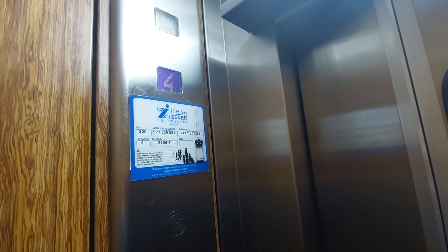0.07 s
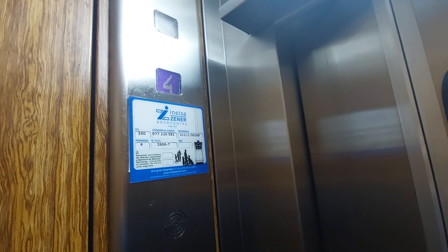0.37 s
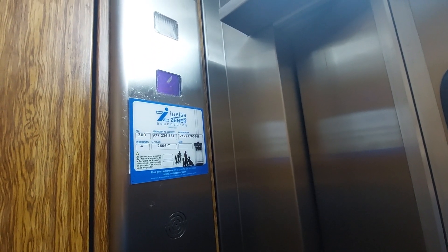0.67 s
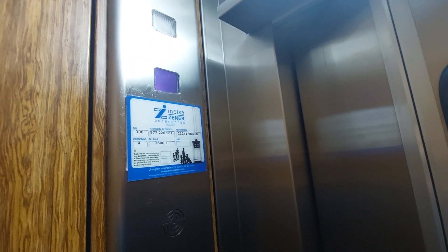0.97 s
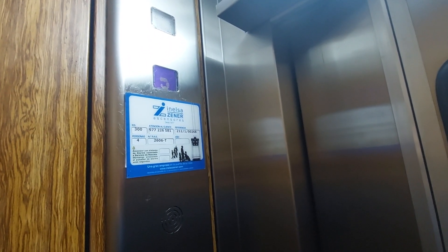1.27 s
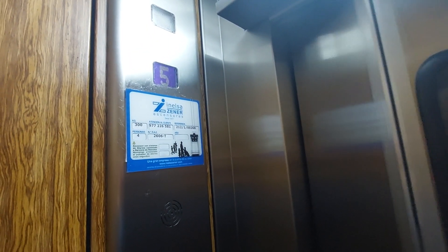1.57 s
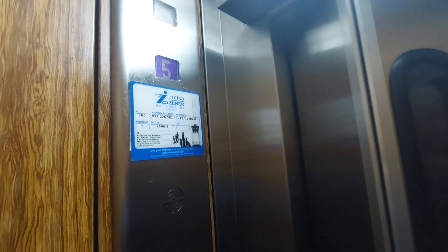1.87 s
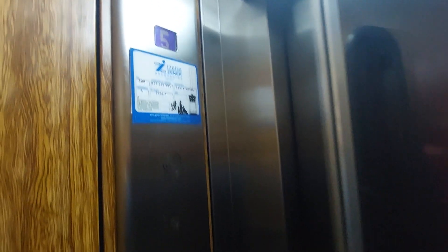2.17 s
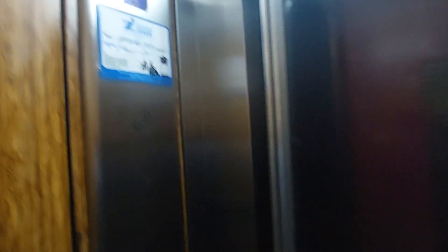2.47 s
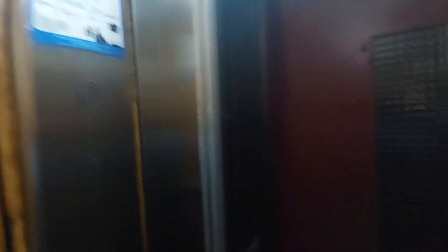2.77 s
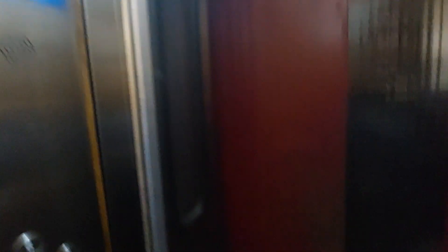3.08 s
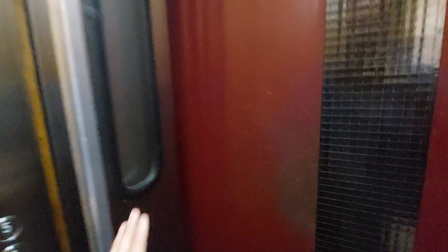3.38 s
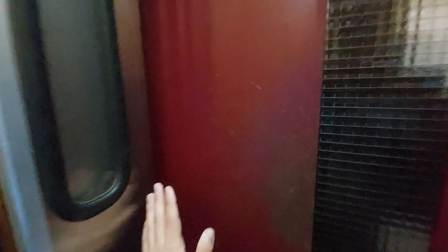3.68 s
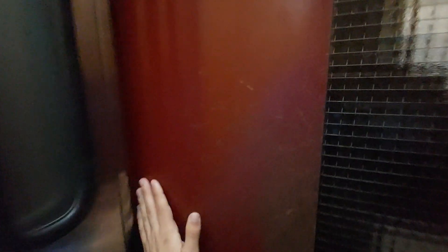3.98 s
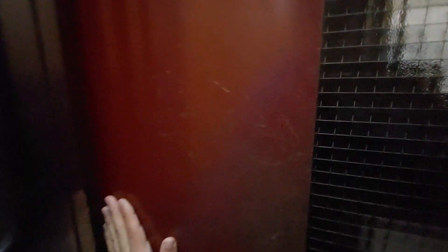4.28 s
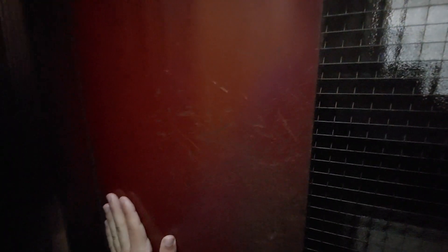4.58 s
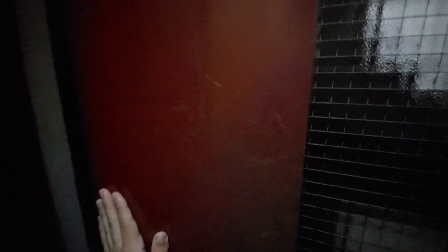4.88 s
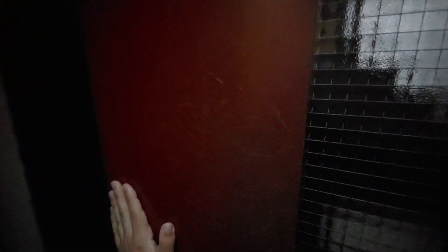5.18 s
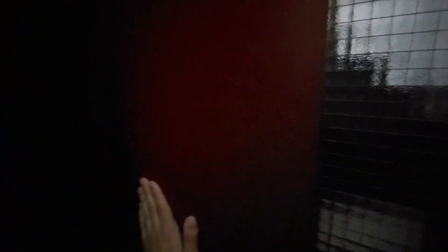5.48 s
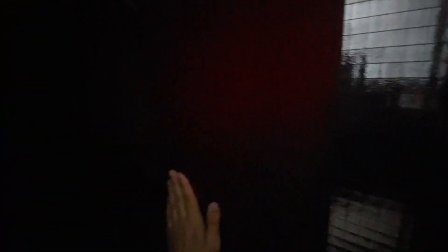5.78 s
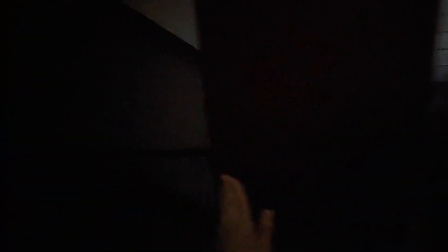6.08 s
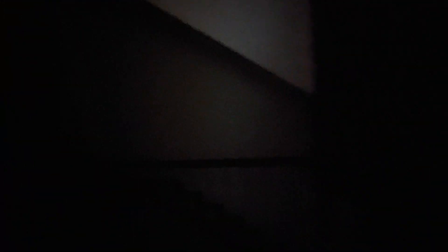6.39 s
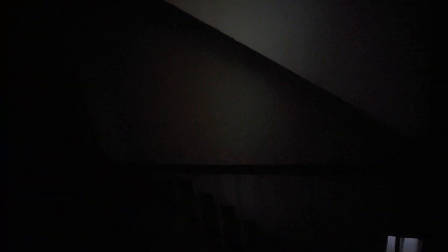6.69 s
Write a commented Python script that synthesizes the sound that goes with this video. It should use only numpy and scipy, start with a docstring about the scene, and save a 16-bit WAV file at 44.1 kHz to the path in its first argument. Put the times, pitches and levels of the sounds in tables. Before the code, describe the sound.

Inside a small lift, the sliding steel doors engage with a sharp clunk and clatter, then roll open with a low motor hum, rumble and loose metallic rattling. As they stop, a hinged metal landing door is pushed: its catch clacks and the stiff hinge gives a low, booming groan. Dull footsteps and a few knocks follow out into a quiet stairwell. Everything is heard close up.

```python
"""Leaving a small steel lift

The door motor hums while the sliding panels roll open, shudder and rattle.
Then a hand pushes the hinged landing door: its catch clacks, the hinge sticks and slips so that it
groans through the metal door, and there are dull steps and knocks out in the stairwell."""
import sys
import numpy as np
from scipy import signal
from scipy.fft import rfft, irfft
from scipy.io import wavfile
from scipy.ndimage import uniform_filter1d

SR = 44100
rng = np.random.default_rng(int(sys.argv[2]) if len(sys.argv) > 2 else 0)


def bounce(signal):
    """Save signal as a 16-bit WAV file at the path given by the first command-line argument."""
    frames = np.transpose(np.atleast_2d(signal))
    limited = np.clip(frames, -1, 1)
    pcm = np.round(limited * 32767).astype(np.int16)
    wavfile.write(sys.argv[1], SR, pcm)


N = 301862
TIME = np.arange(N) / SR
FREQ = np.fft.rfftfreq(N, 1 / SR)
RUN_DOWN_DB_PER_S = 175  # how fast the machinery falls silent

# How alike left and right sound (1 is the same, 0 unrelated): pitch_hz, likeness
STEREO_LIKENESS = [(40, 0.99), (110, 0.95), (200, 0.77), (380, 0.71), (700, 0), (1300, 0), (15000, 0)]
# Pitches at which the rollers and the frame ring: pitch_hz, width_hz, boost_db
FRAME_RESONANCES = [(636, 22, 8), (691, 24, 7), (860, 22, 5), (971, 16, 7), (1088, 18, 4), (1800, 16, 4)]
# Pitches at which the metal door rings: pitch_hz, width_hz, boost_db
DOOR_RESONANCES = [(165, 10, 4), (193, 12, 10), (237, 10, 7), (281, 12, 9), (311, 14, 8), (340, 12, 5),
                   (392, 12, 10), (418, 10, 4), (614, 16, 9), (700, 14, 7), (867, 20, 6), (930, 20, 6),
                   (2810, 30, 12)]


def amp(db):
    """Turns decibels into a factor to multiply by."""
    return 10 ** (np.asarray(db) / 20)


def steadied(x, span_s):
    """Holds the average level near 1 over span_s, keeping faster detail."""
    power = uniform_filter1d(np.mean(np.atleast_2d(x), 0) ** 2, max(int(span_s * SR), 8))
    power = uniform_filter1d(power, max(int(span_s * SR / 2), 8))
    return x / np.sqrt(np.abs(power) + 1e-12)


def at_pitch(rows, hz):
    """Looks up a table by pitch, on a logarithmic scale."""
    pitches, values = np.transpose(rows)
    return np.interp(np.log(hz + 1), np.log(pitches + 1), values)


def curve(rows):
    """Joins (time, value) points with straight lines."""
    return np.interp(TIME, *np.transpose(rows))


def wander(hz):
    """A random drift of typical size 1, changing up to about hz times a second."""
    drift = irfft(rfft(rng.standard_normal(N)) * np.exp(-(FREQ / hz) ** 2), N)
    return drift / np.sqrt(np.mean(drift ** 2) + 1e-20)


def noise():
    """Separate white noise for left and right."""
    return rng.standard_normal((2, N))


def impacts(per_s, spread_db):
    """Tiny blows at random times; spread_db makes their sizes uneven."""
    hits = rng.random(N) < per_s / SR
    sizes = amp(spread_db * np.minimum(rng.exponential(1, N), 4))
    return hits * sizes * rng.choice([-1, 1], N)


def blend_sides(pair, hz):
    """Makes two unrelated signals alike at low pitches."""
    left, other = pair
    likeness = np.clip(at_pitch(STEREO_LIKENESS, hz), -1, 1)
    return np.array([left, likeness * left + np.sqrt(1 - likeness ** 2) * other])


def colour(pair, tone, resonances=()):
    """Gives a stereo signal an object's tone and ringing pitches, at an average level of 1."""
    gain = amp(at_pitch(tone, FREQ))
    for hz, width_hz, boost_db in resonances:
        gain *= 1 + (amp(boost_db) - 1) / (1 + (2 * (FREQ - hz) / width_hz) ** 2)
    out = irfft(blend_sides(rfft(pair) * gain, FREQ), N)
    return out / np.sqrt(np.mean(out.mean(0) ** 2) + 1e-20)


def ring(drive, ring_s, direct, count=4):
    """Echoes in sheet metal and walls, 60 dB down after ring_s, changing as the doors move."""
    tails = rng.standard_normal((count, 2, SR)) * amp(-60 * TIME[:SR] / ring_s)
    tails /= np.linalg.norm(tails, axis=2, keepdims=True)
    turn = np.arange(N) // 1500 % count  # the echo patterns take turns
    echoes = sum(signal.fftconvolve((drive * (turn == k))[None], tails[k], axes=1) for k in range(count))
    return direct * drive + echoes[:, :N]


def swell(start_s, rise_s, length_s, fall_db_per_s):
    """A level that starts 19 dB down, climbs to 1, holds until length_s is over, then fades."""
    t = TIME - start_s
    on = (t >= 0) & (t < length_s + 80 / fall_db_per_s)
    rise_db = -19 * np.maximum(1 - t / rise_s, 0)
    fall_db = -fall_db_per_s * np.maximum(t - length_s, 0)
    gain = np.zeros(N)
    gain[on] = amp(rise_db[on] + fall_db[on])
    return gain


def swells(events, fall_db_per_s):
    """The combined level of several swells: start_s, rise_s, length_s, level_db."""
    return np.sqrt(sum((amp(db) * swell(*timing, fall_db_per_s)) ** 2 for *timing, db in events))


def idling():
    """1 while the lift's machinery is live, fading once the doors have stopped."""
    return amp(-RUN_DOWN_DB_PER_S * np.maximum(TIME - 4.07, 0))


def door_speed():
    """How fast the panels slide: 0 at rest, 1 at full speed."""
    # The panels' travel: time_s, share_of_full_speed
    speeds = [(.55, 0.58), (1.1, 0.87), (1.6, 0.99), (2.3, 1), (3.3, 0.84), (3.65, 0.66), (3.8, 0.26),
              (4.02, 0)]
    return np.interp(TIME, *np.transpose(speeds), left=0, right=0)


def air():
    """Faint hiss in the lift, and the wider hush of the stairwell."""
    # Tone of the air in each space: pitch_hz, gain_db
    car_tone = [(290, -13.5), (500, -40.5), (805, -6), (986, -17.5), (2060, -19), (6000, -31.5),
                (15800, -21.5)]
    stairwell_tone = [(30, -10), (60, 2), (110, -12), (160, 4), (210, -17.5), (300, -10), (480, -29),
                      (900, -27), (1500, -22), (2200, -17), (2900, -22.5), (4200, -32), (8500, -35.5),
                      (12500, -29), (15500, -32)]
    # Stairwell sound let in as the doors part: time_s, level_db
    opening = [(1.2, -91), (2.2, -52.5), (3.3, -53.5), (4.2, -57.5), (4.6, -61), (5.8, -65.5), (6.1, -61.5),
               (6.84, -68)]
    hiss = colour(noise(), car_tone) * amp(-79)
    hush = colour(noise(), stairwell_tone) * amp(curve(opening) + 0.4 * wander(2.2))
    return hiss + hush


def steps():
    """Weight shifts on the lift floor and the landing, with soft scuffing."""
    # Steps on the way out: start_s, rise_s, length_s, footfall_db, scuff_db
    footfalls = [(4.24, 0.047, .14, -48, -65), (4.47, .02, .04, -45, -75), (4.6, 0.11, .95, -59.5, -73),
                 (5.41, 0.025, 0.25, -63, -66.5), (5.574, 0.087, .14, -41, -53),
                 (6.216, 0.027, .12, -40.5, -60), (6.367, 0.037, 0.1, -36, -66),
                 (6.478, .03, 0.065, -39, -66.5), (6.684, .03, 0.2, -55.5, -70)]
    # Tone of a footfall and of a scuff: pitch_hz, gain_db
    step_tone = [(20, -19.5), (40, -17), (60, -3), (85, -15), (140, -13), (300, -15), (480, -28.5),
                 (1000, -72)]
    scuff_tone = [(290, -26), (500, 3), (630, -2.5), (817, -6), (2350, -0.5), (4120, -15), (9120, -22.5),
                  (13700, -13), (15800, -25)]
    weight = swells([(*timing, db) for *timing, db, _ in footfalls], fall_db_per_s=94)
    scuff = swells([(*timing, db) for *timing, _, db in footfalls], fall_db_per_s=62.5)
    thump = steadied(colour(noise(), step_tone, resonances=[(57.7, 2.8, 13.7)]), 0.24)
    return thump * weight + colour(noise(), scuff_tone) * scuff


def knocks():
    """Each blow thuds the door, clanks the frame and clicks the catch, leaving a tail in the shaft."""
    # Blows on the doors and their catches: start_s, thud_db, clank_db, click_db
    blows = [(.553, -33, -56, -63), (0.573, -31, -38, -45.5), (0.625, -26, -34, -43),
             (0.637, -45, -32, -43.5), (.822, -50, -42, -42), (.848, -52, -35, -52), (1.126, -40, -50, -75),
             (1.574, -37, -39.5, -48), (2.538, -41.5, -54, -64), (3.028, -63, -53, -52),
             (3.613, -42, -43, -50), (3.800, -54, -48.5, -65), (3.867, -73, -45.5, -64.5),
             (3.903, -50, -52.5, -63.5), (4.237, -46, -56, -52), (4.266, -38, -56, -62.5),
             (4.302, -37.5, -43, -45), (4.312, -33.5, -37.5, -42.5), (4.354, -32.5, -48.5, -64),
             (4.432, -37.5, -49, -65), (4.672, -59, -53.5, -92), (5.062, -35, -52.5, -88),
             (5.240, -35.5, -67, -92), (5.470, -48, -64, -67), (5.510, -57, -67, -72),
             (5.62, -46, -55, -60), (5.666, -40, -52, -71), (6.216, -42, -56.5, -65),
             (6.446, -48, -52, -73), (6.716, -49, -70, -86)]
    # Tone of the door, the frame and the catch: pitch_hz, gain_db
    thud_tone = [(30, -26), (60, -14), (110, 3), (170, 3.5), (310, 0), (430, -5.5), (560, -11), (800, -7),
                 (1500, -51)]
    clank_tone = [(250, -46), (550, -0.5), (900, 1.5), (1400, 0.5), (2300, 1), (2900, -4), (3600, -43),
                  (7000, -64)]
    click_tone = [(1500, -4.5), (3200, 10), (4500, 5), (6500, 0.5), (8500, -5.5), (12500, -3.5),
                  (15500, -6)]
    starts_s, thud_db, clank_db, click_db = np.transpose(blows)

    def struck(levels_db, tone, resonances, rise_s, ring_s, tail_db, tail_s):
        """One part's answer to all the blows: a quick ring and a weaker, longer tail."""
        power = np.zeros(N)
        for start_s, db in zip(starts_s, levels_db):
            start = round(start_s * SR)
            t = TIME[:min(N - start, SR)]
            attack = 1 - np.exp(-t / rise_s)
            decay = amp(-60 * t / ring_s) ** 2 + amp(tail_db - 60 * t / tail_s) ** 2
            power[start:start + len(t)] += (amp(db) * attack) ** 2 * decay
        return steadied(colour(noise(), tone, resonances), 0.12) * np.sqrt(power)

    thud = struck(thud_db, thud_tone, DOOR_RESONANCES, rise_s=.008, ring_s=.35, tail_db=-14, tail_s=1)
    clank = struck(clank_db, clank_tone, FRAME_RESONANCES,
                   rise_s=.0012, ring_s=.16, tail_db=-9, tail_s=.55)
    click = struck(click_db, click_tone, (), rise_s=.0004, ring_s=.17, tail_db=-17, tail_s=.55)
    return thud + clank + click


def hinge():
    """The stiff hinge sticks and slips in a few groans, and the metal door booms with it."""
    # How fast the hinge slips: time_s, slips_per_s
    slip_rate = [(4.65, 86), (4.73, 101.5), (4.76, 102.5), (4.81, 99), (4.86, 90), (4.91, 72), (4.97, 71),
                 (5.08, 80.7), (5.3, 59.5), (5.65, 56.3)]
    # Groans as the hinge binds: start_s, rise_s, length_s, boom_db, rasp_db
    groans = [(4.67, 0.072, 0.16, -27, -48.5), (4.899, 0.028, 0.077, -36, -44.5),
              (5.035, 0.011, 0.025, -41, -49.5), (5.172, .008, 0.075, -41, -55.5),
              (5.496, 0.022, 0.058, -45, -63.5)]
    # Tone of the metal door: pitch_hz, gain_db
    door_tone = [(50, -30), (115, -14), (160, 7.5), (200, 3.5), (330, 1.5), (420, -2), (490, -3.5),
                 (630, -5.5), (800, -15), (1400, -23.5), (2200, -31), (2850, -43), (3200, -56.5),
                 (8000, -65)]
    uneven = np.interp(TIME, [4.82, 4.95], [.03, .18])  # the slips lose rhythm as the door speeds up
    slip_count = np.cumsum(curve(slip_rate) * (1 + uneven * wander(70))) / SR
    slips = np.abs(np.diff(np.floor(slip_count), prepend=0)) * amp(2 * wander(88))
    rub = .02 * rng.standard_normal(N)
    door = colour(ring(slips + rub, ring_s=.55, direct=.25), door_tone, DOOR_RESONANCES)
    boom = signal.sosfiltfilt(signal.butter(4, 850, fs=SR, output="sos"), door)
    rasp = door - boom
    boom_level = swells([(*timing, db) for *timing, db, _ in groans], fall_db_per_s=65)
    rasp_level = swells([(*timing, db) for *timing, _, db in groans], fall_db_per_s=106)
    return steadied(boom, 0.047) * boom_level + steadied(rasp, 0.035) * rasp_level


def drive_arm():
    """The arm clatters as it takes hold of the sliding panels."""
    # Tone of the arm: pitch_hz, gain_db
    tone = [(400, -14), (580, 5), (750, -25), (1000, -3.5), (1300, 0.5), (1900, -2.5), (2400, 2),
            (3200, -10), (5000, -19.5), (9000, -32)]
    # Pitches at which it rings: pitch_hz, width_hz, boost_db
    resonances = [(632, 18, 12), (860, 18, 8), (971, 16, 11), (1088, 18, 9), (1888, 20, 8), (1960, 20, 8),
                  (2345, 22, 10), (2552, 20, 7)]
    # Its tugs on the panels: start_s, length_s, level_db
    tugs = [(0.556, 0.063, -43.5), (0.615, 0.042, -33), (0.712, .025, -41.5), (.81, .025, -45),
            (0.88, 0.018, -41)]
    touches = ring(impacts(per_s=300, spread_db=1), ring_s=0.24, direct=0.44, count=2)
    level = swells([(start, 0.012, length, db) for start, length, db in tugs], fall_db_per_s=147)
    return steadied(colour(touches, tone, resonances), 0.065) * level


def chinks():
    """Struck panels and latch parts each ring at a cluster of close pitches; low ones wake slower."""
    # Blows on single steel parts: start_s, pitch_hz, width_hz, level_db, ring_s
    strikes = [(.630, 12800, 1400, -48, 0.21), (.668, 993, 150, -34.5, 0.63), (.826, 2270, 200, -37, 0.38),
               (.848, 620, 34, -32, 0.59), (1.068, 56, 6.9, -30, 0.97), (1.722, 613, 17, -37, 0.45),
               (1.728, 2160, 76, -50, 0.46), (3.166, 2000, 480, -53, 0.35), (3.175, 1826, 24, -42.5, 0.4),
               (3.31, 166, 11, -37, 0.74), (4.236, 2280, 1300, -44.5, 0.37), (4.304, 11500, 5600, -38, .14),
               (4.428, 632, 130, -45.5, 0.54), (5.182, 1780, 570, -45.5, 0.18),
               (5.510, 586.7, 240, -49, .2), (5.621, 2530, 550, -55, 0.12), (5.667, 1090, 490, -48, 0.24),
               (6.215, 2460, 300, -44.5, 0.017)]
    t = TIME[:SR // 2]
    pitches = np.fft.rfftfreq(len(t), 1 / SR)
    out = np.zeros((2, N))
    for start_s, hz, width_hz, db, ring_s in strikes:
        band = np.exp(-((pitches - hz) / width_hz) ** 2)
        cluster = irfft(rfft(rng.standard_normal((2, len(t)))) * band, len(t))
        envelope = amp(-60 * t / ring_s) * (1 - np.exp(-t * hz))
        sound = blend_sides(cluster, hz) * envelope
        sound *= amp(db) * np.linalg.norm(envelope) / np.linalg.norm(sound.mean(0))
        start = round(start_s * SR)
        out[:, start:start + len(t)] += sound[:, :N - start]
    return out


def rattle():
    """Loose steel fittings chatter in bursts; in between they tremble with the door's speed."""
    # Tone of the fittings: pitch_hz, gain_db
    tone = [(900, -19), (1500, -3.5), (2000, 2.5), (2400, 0.5), (2900, -3.5), (3600, -9), (5100, -12),
            (5500, -3), (6150, -4), (6900, -16), (8800, -24), (10500, -17), (15500, -19.5)]
    # Pitches at which they ring: pitch_hz, width_hz, boost_db
    resonances = [(1938, 14, 9), (2026, 14, 10), (2072, 14, 8), (2115, 14, 10), (2225, 18, 13),
                  (2347, 16, 8), (2495, 14, 8), (2552, 14, 7), (2770, 14, 11), (4120, 20, 6),
                  (5466, 14, 11), (5534, 18, 4), (6092, 20, 6), (6172, 22, 8), (6765, 22, 7)]
    # Bursts of chatter: start_s, rise_s, length_s, relative_level_db
    bursts = [(.565, .025, .2, -56), (.622, .012, 0.016, -47), (.77, 0.015, .11, -46),
              (.955, 0.022, 0.093, -54.5), (1.23, 0.0081, 0.077, -56.5), (1.447, .005, 0.057, -64),
              (1.635, 0.11, 0.11, -38.5), (2.012, 0.0046, 0.055, -61), (2.105, .01, 0.25, -56),
              (2.456, 0.0071, 0.028, -56), (2.65, .012, 0.094, -51), (2.812, 0.0055, 0.02, -58),
              (2.865, 0.012, 0.12, -58), (2.97, 0.044, 0.07, -47.5), (3.155, 0.02, 0.045, -42.5),
              (3.255, .01, 0.043, -54), (3.41, .02, 0.086, -67.5), (3.61, 0.018, 0.034, -62)]
    touches = ring(impacts(per_s=700, spread_db=2.5), ring_s=0.16, direct=0.36, count=6)
    shaking = np.hypot(swells(bursts, fall_db_per_s=219), amp(-76.5) * door_speed())
    return steadied(colour(touches, tone, resonances), 0.04) * shaking * amp(7)


def sliding_doors():
    """Rollers bump along the track, drumming the panels as the car shakes; speed and jolts add level."""
    # Tone of the lift car, the panels and the rollers: pitch_hz, gain_db
    car_tone = [(15, -54), (30, 13), (45, 5.5), (62, 12), (80, 21), (110, 9.5), (200, -59)]
    panel_tone = [(70, -43), (125, 2.5), (200, 1), (330, 3), (470, -4), (600, -11), (1000, -48)]
    roller_tone = [(300, -45), (500, 3), (680, 0.5), (850, -4), (1250, -13.5), (2200, -13.5), (3000, -13.5),
                   (4000, -29.5), (7000, -39), (9000, -52), (15000, -41)]
    # Pitches at which the panels ring: pitch_hz, width_hz, boost_db
    panel_resonances = [(163, 12, 8), (191, 10, 5), (239, 12, 7), (312, 16, 7), (355, 14, 8), (418, 12, 4),
                        (468, 12, 7)]
    # Jolts of the door gear: start_s, length_s, car_db, panel_db, roller_db
    jolts = [(0.061, 0.053, -63, -57, -78.5), (0.589, 0.26, -31, -29.5, -38.5),
             (0.81, 0.089, -33, -25.5, -36), (0.936, 0.16, -32, -42.5, -61),
             (1.441, 0.021, -49, -35.5, -58), (1.712, 0.018, -55, -48, -35), (2.745, 0.034, -38, -62, -48),
             (2.995, 0.038, -39, -41, -42.5), (3.115, 0.028, -57, -41, -55)]
    starts_s, lengths_s, car_db, panel_db, roller_db = np.transpose(jolts)
    rises_s = np.full(len(jolts), 0.026)
    car_jolts = swells(zip(starts_s, rises_s, lengths_s, car_db), fall_db_per_s=41)
    panel_jolts = swells(zip(starts_s, rises_s, lengths_s, panel_db), fall_db_per_s=111)
    roller_jolts = swells(zip(starts_s, rises_s, lengths_s, roller_db), fall_db_per_s=111)

    speed = door_speed()
    car_level = np.hypot(car_jolts, np.hypot(amp(-44.5) * speed ** 0.32, amp(-51.5) * idling()))
    panel_level = np.hypot(panel_jolts, amp(-42.5) * speed ** 1.24 + amp(-67) * idling())
    roller_level = np.hypot(roller_jolts, amp(-44.5) * speed ** 1.15)

    bumps = impacts(per_s=1100, spread_db=0)
    shudder = steadied(colour(noise(), car_tone), 0.064)
    drumming = ring(bumps, ring_s=0.25, direct=0.3)
    panels = steadied(colour(drumming, panel_tone, panel_resonances), 0.17)
    rolling = ring(bumps, ring_s=0.22, direct=0.29, count=5)
    rollers = steadied(colour(rolling, roller_tone, FRAME_RESONANCES), 0.057)
    return shudder * car_level + panels * panel_level + rollers * roller_level


def motor():
    """The door motor's electric hum throbs at the start, follows the load and sags as it stops."""
    # The motor's note: time_s, pitch_hz
    pitch = [(0, 97), (.5, 98.8), (.7, 91.3), (.9, 99.47), (3.45, 100.4), (3.62, 96.6), (3.72, 87.86),
             (4.2, 80.7)]
    # Overtones and gear tones under load: multiple_of_pitch, relative_level_db
    overtones = [(2.002, -41), (3, -22), (4, -34), (4.68, -30.5), (6.9, -24)]
    # How the load sets the strength of the hum: time_s, level_db
    load = [(.65, -24), (1.05, -26.5), (1.6, -30), (2.25, -28.5), (2.31, -24.5), (2.37, -27.5), (3.0, -28),
            (3.63, -31)]
    # Faint tones of the waiting lift: pitch_hz, level_db
    waiting_tones = [(64.6, -85), (199.2, -73), (301.5, -61.5), (355.3, -74)]
    cycles = np.cumsum(curve(pitch) * (1 + 0.0073 * wander(7.04))) / SR
    engaged = np.interp(TIME, [.55, 1], [0, 1])  # gear tones fade in, waiting tones fade out
    gears = sum(amp(db + 3.5 * wander(4.3)) * np.sin(2 * np.pi * multiple * cycles + 0.73 * wander(8.57))
                for multiple, db in overtones)
    hum = np.sin(2 * np.pi * cycles) + engaged * gears

    crest_s, period_s, depth, settle_s = .695, .175, 0.62, 0.98
    settling = np.exp(-np.maximum(TIME - crest_s, 0) / settle_s)
    throb = 1 - depth * settling * np.sin(np.pi * (TIME - crest_s) / period_s) ** 2
    running = swell(start_s=.555, rise_s=0.041, length_s=3.11, fall_db_per_s=RUN_DOWN_DB_PER_S)
    driving = running * amp(curve(load) + 2 * wander(11.4)) * throb
    resting = idling() * amp(-55.5 + 11 * wander(3))  # a weak hum before and just after the run
    waiting = sum(amp(db + 4.2 * wander(6.4)) * np.sin(2 * np.pi * hz * TIME)
                  for hz, db in waiting_tones)
    return np.sqrt(2) * (hum * np.hypot(driving, resting) + waiting * (1 - engaged))


def scene():
    """The lift doors, the landing door, the steps and the air, added together in stereo."""
    lift_doors = motor() + sliding_doors() + rattle() + drive_arm() + chinks()
    return lift_doors + knocks() + hinge() + steps() + air()


def record(dry):
    """Leans the sound to the right and trims the deepest bass and the highest treble."""
    # Balance between the sides: pitch_hz, left_minus_right_db
    balance = [(60, -2.5), (99, -2.5), (160, -3.0), (270, -4.0), (450, -3.0), (740, -3.5), (1220, -4.5),
               (2010, -9.5), (3330, -9.5), (5500, -0.5), (9080, -4.5), (15000, -8.5)]
    bass_edge_hz, treble_edge_hz = 36.0, 15850
    lean_db = at_pitch(balance, FREQ)
    sides = amp(np.array([lean_db, -lean_db]) / 2)
    sides /= np.sqrt(np.mean(sides ** 2, 0))
    low_cut = FREQ ** 3 / np.sqrt(FREQ ** 6 + bass_edge_hz ** 6)
    high_cut = signal.firwin(511, treble_edge_hz, window=("kaiser", 9), fs=SR)
    heard = irfft(rfft(dry) * low_cut * sides, N)
    return signal.oaconvolve(heard, high_cut[None], "same")


dry = scene()
out = record(dry)
bounce(out)
```